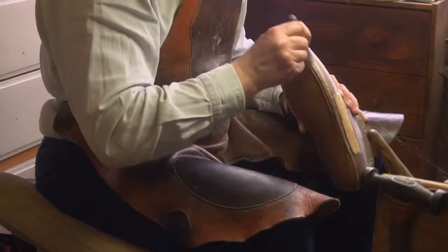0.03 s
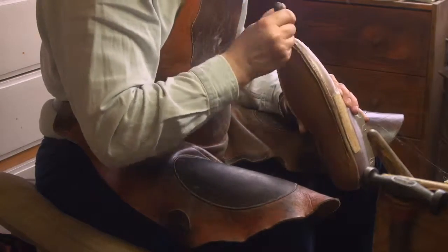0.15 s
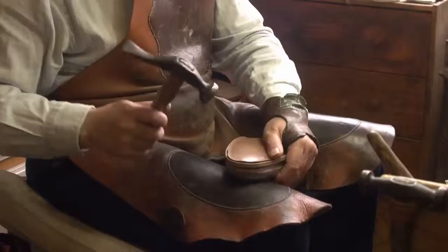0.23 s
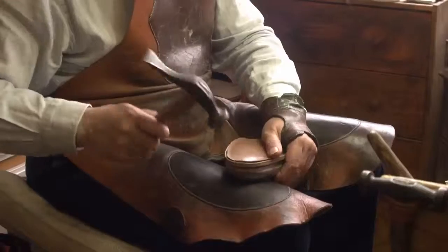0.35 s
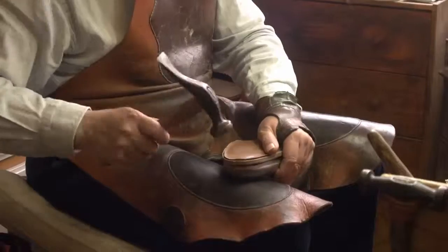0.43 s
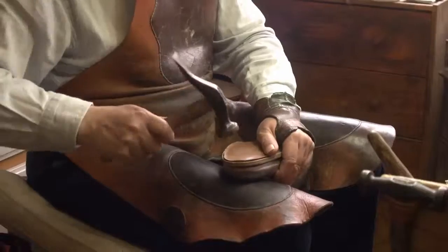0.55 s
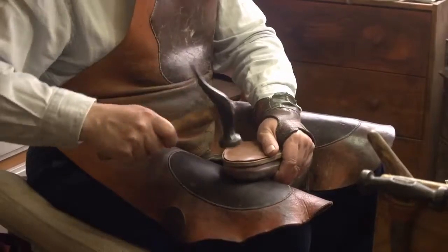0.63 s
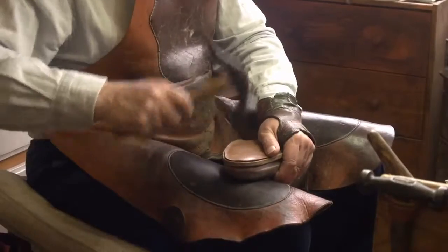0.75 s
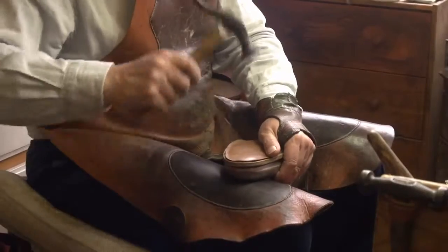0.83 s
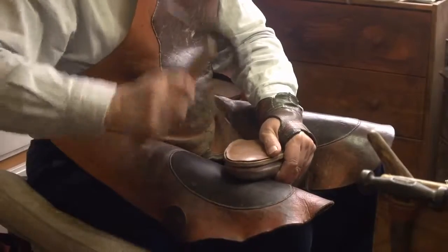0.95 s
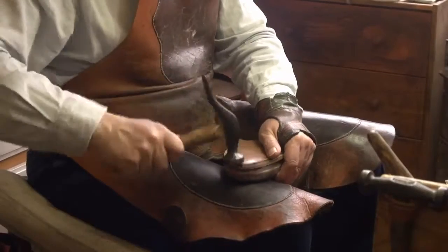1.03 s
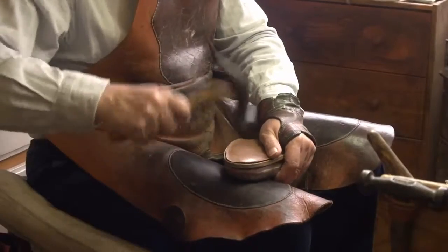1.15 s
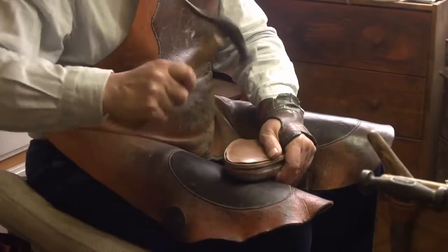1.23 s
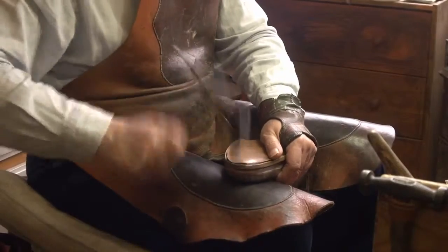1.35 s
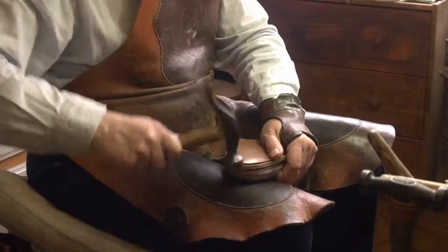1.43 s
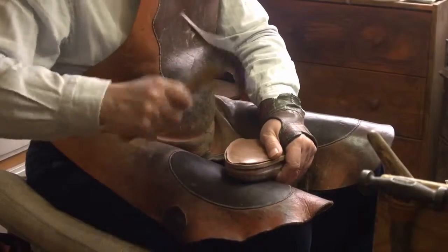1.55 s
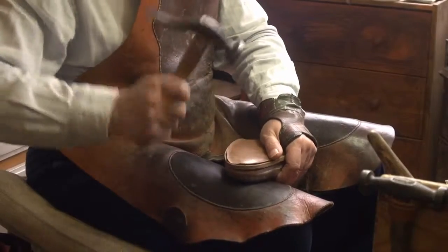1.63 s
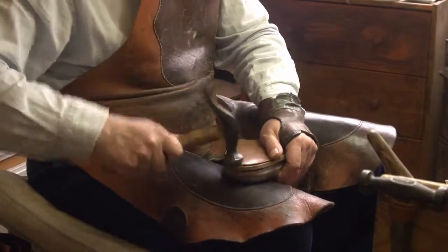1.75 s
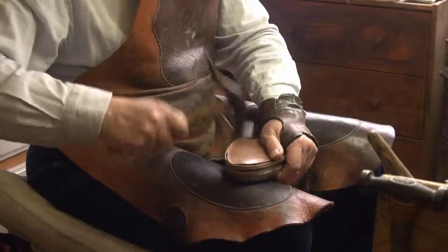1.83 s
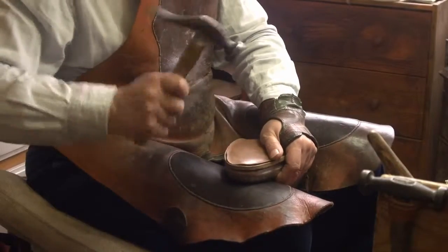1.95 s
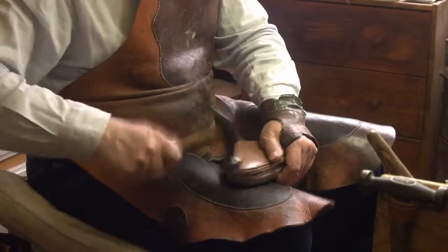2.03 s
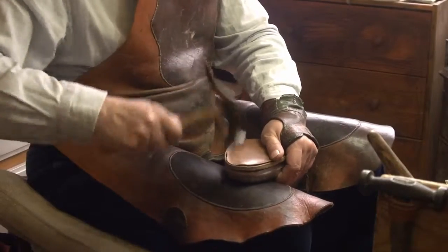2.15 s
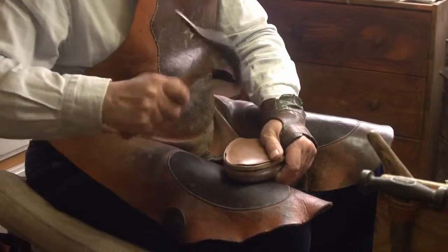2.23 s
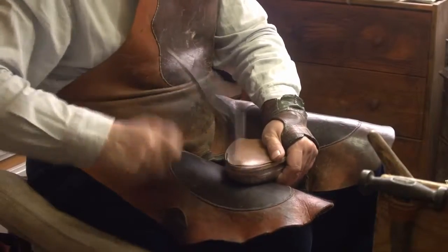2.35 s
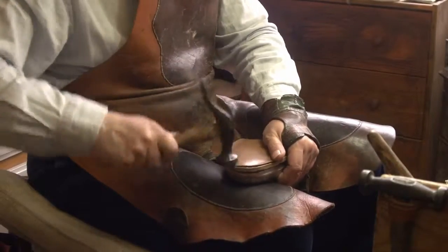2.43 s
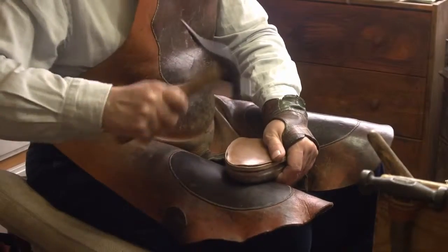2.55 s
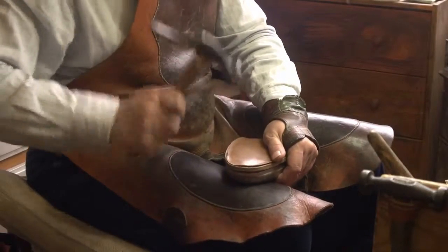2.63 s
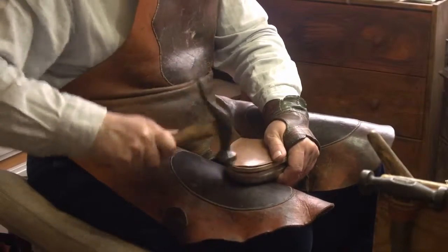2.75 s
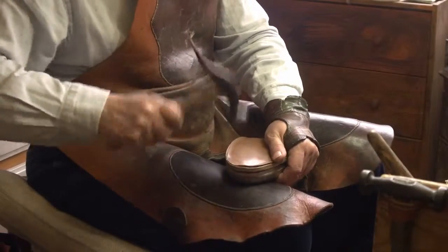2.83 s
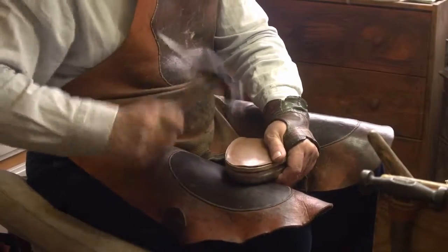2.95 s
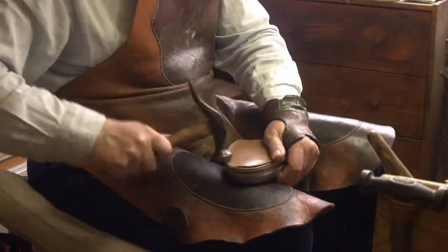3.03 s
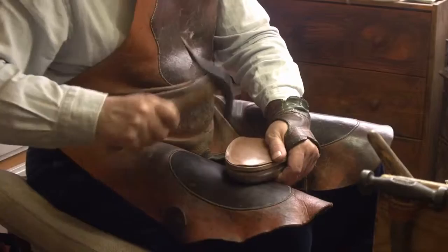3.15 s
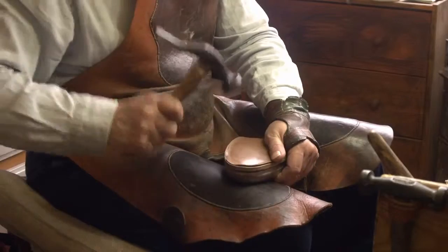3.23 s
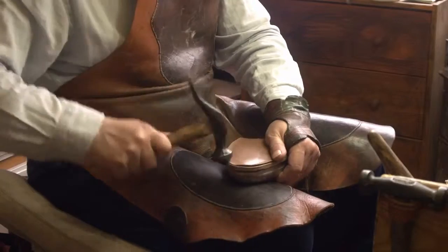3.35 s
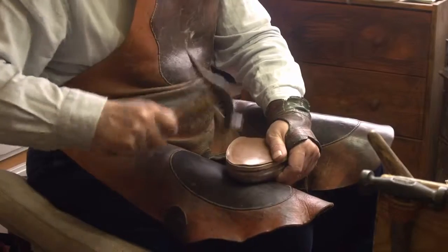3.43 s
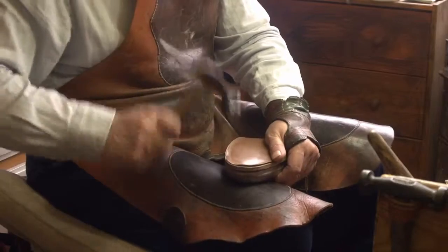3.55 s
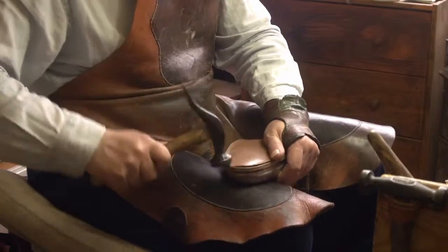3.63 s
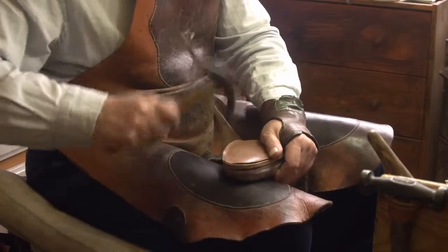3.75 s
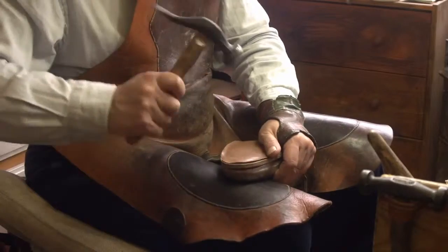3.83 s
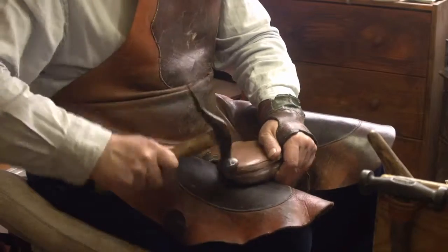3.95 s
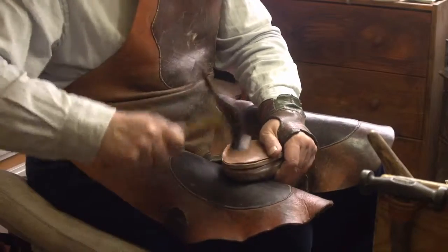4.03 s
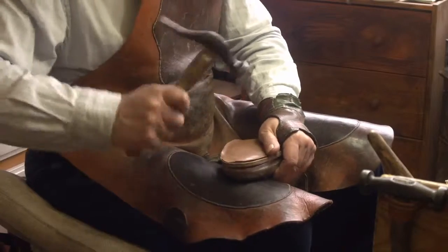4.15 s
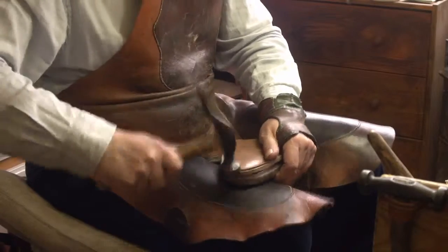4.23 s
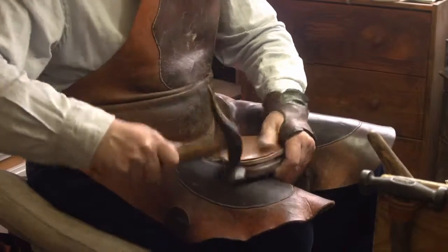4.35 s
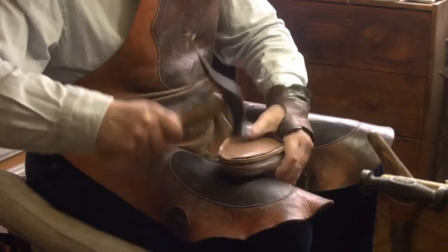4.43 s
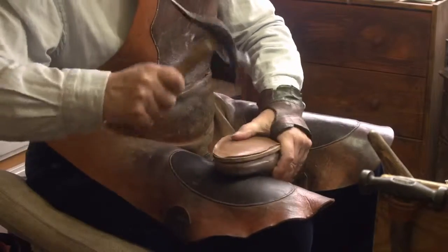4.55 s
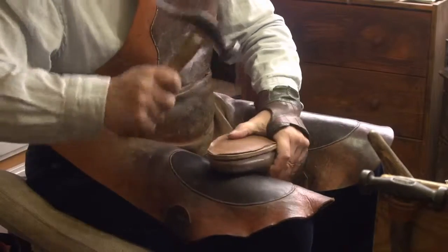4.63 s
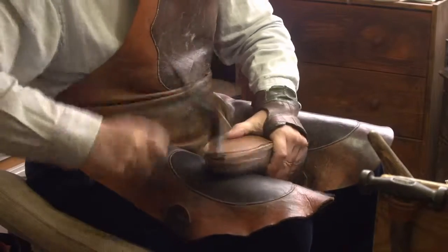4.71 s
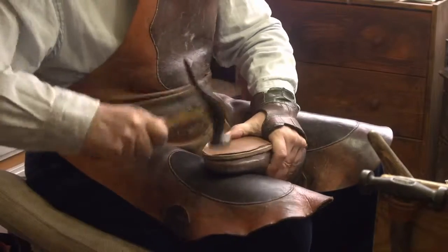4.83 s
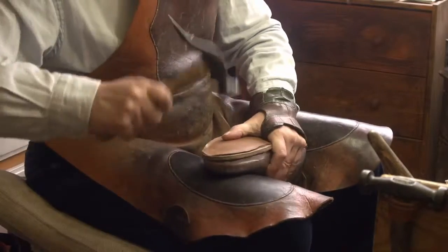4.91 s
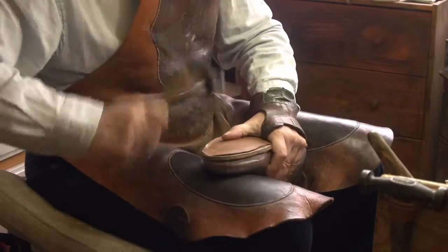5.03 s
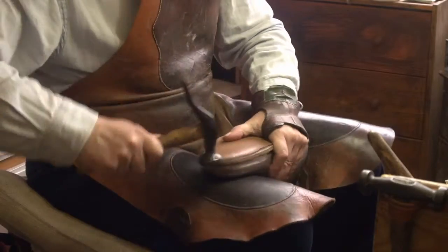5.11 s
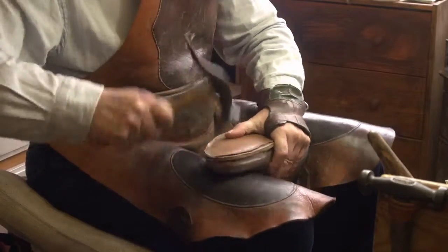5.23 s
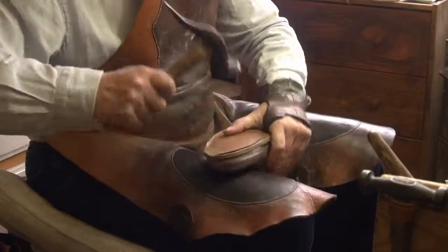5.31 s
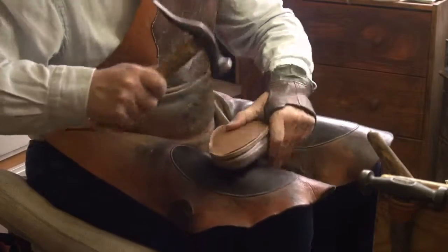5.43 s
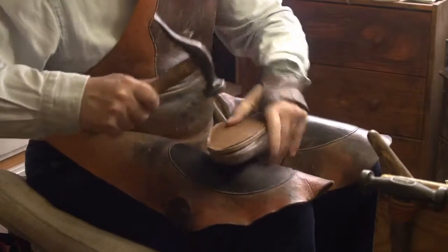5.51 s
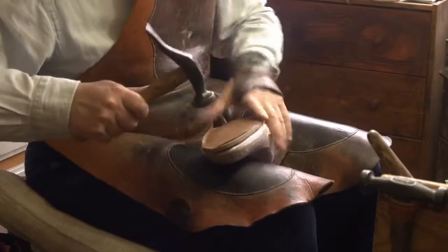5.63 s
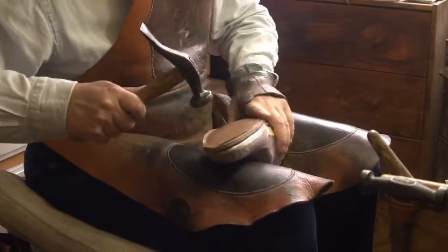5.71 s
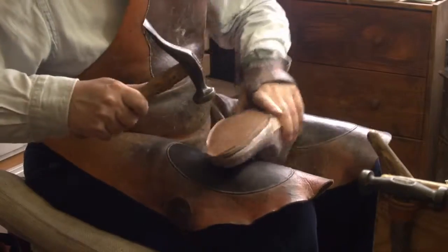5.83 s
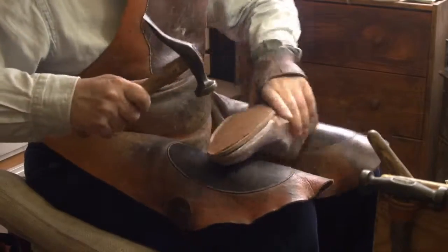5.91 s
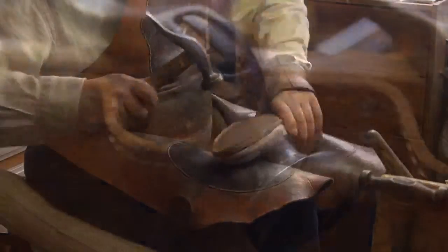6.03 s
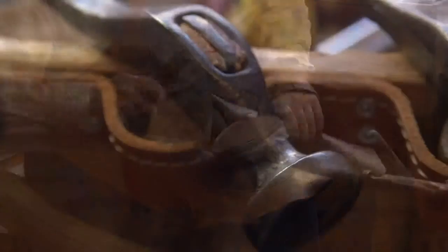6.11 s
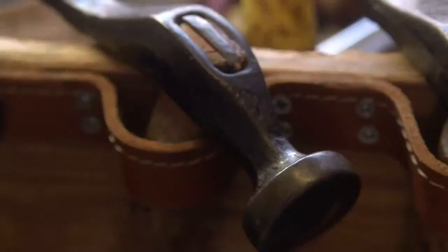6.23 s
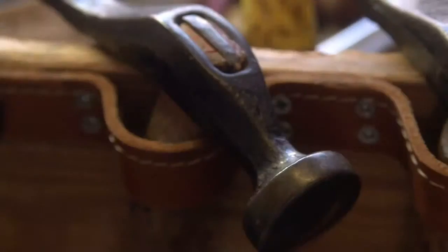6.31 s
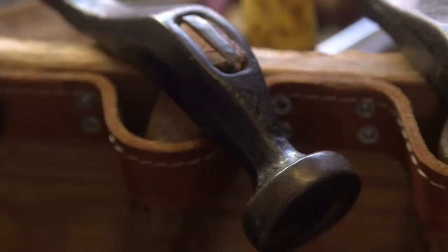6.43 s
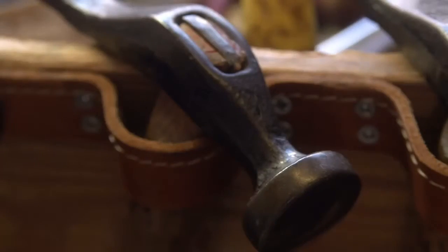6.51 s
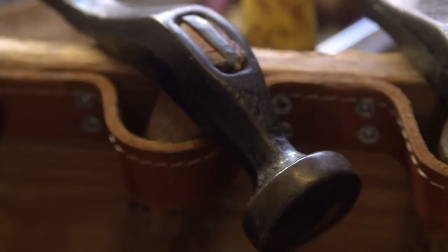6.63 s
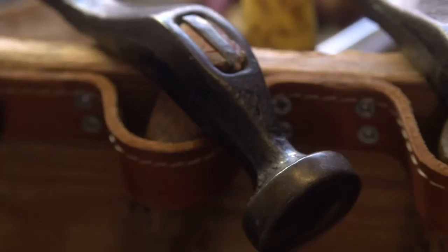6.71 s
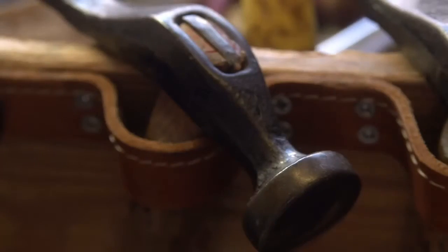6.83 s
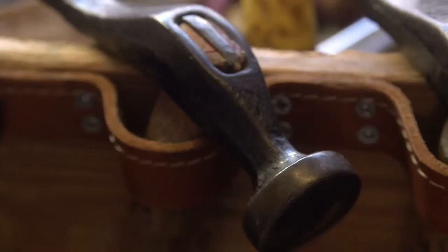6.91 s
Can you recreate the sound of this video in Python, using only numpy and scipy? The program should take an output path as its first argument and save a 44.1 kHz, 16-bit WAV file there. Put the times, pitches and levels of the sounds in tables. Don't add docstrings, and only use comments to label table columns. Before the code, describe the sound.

In a small workshop with low mains hum and room air, a shoe shifts softly on a leather apron. A steel hammer then beats its sole in quick, fairly even blows, each a blunt woody slap with short room ring and faint metallic singing. The shoe is turned with rubbing and creaks, then three duller blows follow. Close microphone, clipped, right channel only.

```python
import sys
import numpy as np
from scipy import signal
from scipy.fft import rfft, irfft, next_fast_len
from scipy.io import wavfile
from scipy.ndimage import uniform_filter1d, map_coordinates

SR = 44100
rng = np.random.default_rng(int(sys.argv[2]) if len(sys.argv) > 2 else 0)


def master(y):
    cut = np.clip(np.atleast_2d(y).T, -1, 1)
    pcm = np.round(cut * 32767)
    wavfile.write(sys.argv[1], SR, pcm.astype(np.int16))


def gain_from_db(level_db):
    decades = np.asarray(level_db, float) / 20
    return 10 ** decades


N = 307377
ONE_SIDE_DB = 6


def along(points, hz):
    f, v = np.transpose(points)
    return np.interp(np.log(hz + 1), np.log(f + 1), v)


def unit(x):
    return x / np.sqrt(np.mean(x ** 2) + 1e-20)


def wobble(rate):
    knots = rng.standard_normal(int(N * rate / SR) + 4)
    return map_coordinates(knots, [np.arange(N) * rate / SR])


def coloured(x, points):
    m = next_fast_len(len(x) + 8192)
    gain = gain_from_db(along(points, np.fft.rfftfreq(m, 1 / SR)))
    cepstrum = irfft(np.log(gain + 1e-6), m)
    cepstrum[1:m // 2] *= 2
    cepstrum[m // 2 + 1:] = 0
    return irfft(rfft(x, m) * np.exp(rfft(cepstrum)), m)[:len(x)]


def hiss(points):
    return unit(coloured(rng.standard_normal(N), points))


def ring(modes, t, scatter_db, turn=0):
    hz, db, t60 = np.transpose(modes)[..., None]
    db = db + scatter_db * rng.standard_normal(hz.shape)
    return np.sum(gain_from_db(db - 60 * t / t60) * np.sin(2 * np.pi * (hz * t + turn)), axis=0)


# frequency in Hz, level in dB per Hz.
AIR = [(20, -7), (54, -16), (125, -16.5), (250, -17), (430, -20.5), (1500, -31), (2500, -42), (5000, -47),
       (15500, -48.5), (16300, -54)]
# start in seconds, length in seconds, level in dB.
WHINES = [
    (0.208, .47, -69.5),
    (.87, .55, -66),
    (1.755, .5, -71),
    (5.62, .35, -68.5),
]


def background():
    now = np.arange(N) / SR
    hum_hz = 49.5 + 1.5 * wobble(6)
    hum = np.sin(2 * np.pi * np.cumsum(hum_hz) / SR) * gain_from_db(3 + 2 * wobble(8))
    hum = gain_from_db(-56 + 2 * wobble(0.84)) * hum
    swells = np.zeros(N)
    for start_s, length_s, db in WHINES:
        swells += gain_from_db(db) * np.sin(np.pi * np.clip((now - start_s) / length_s, 0, 1) ** 0.7)
    whine = swells * gain_from_db(1.5 * wobble(16)) * np.sin(2 * np.pi * 2300 * now)
    air = gain_from_db(-55 + 0.54 * wobble(3.9)) * hiss(AIR)
    return gain_from_db(ONE_SIDE_DB) * (hum + whine + air)


# start in seconds, peak in dB, pitch in Hz.
TICKS = [
    (.181, -74, 4500),
    (0.223, -59, 4500),
    (4.415, -35, 3000),
    (5.05, -69, 4000),
    (5.711, -39, 2900),
    (5.752, -41.5, 1790),
]


def ticks():
    out, t = np.zeros(N + SR), np.arange(SR // 2) / SR
    for s, db, hz in TICKS:
        burst = gain_from_db(-60 * t / 0.056) * rng.standard_normal(len(t))
        puff = coloured(burst, [(1000, 5.5), (10000, -11)])
        out[round(s * SR):][:len(t)] += gain_from_db(db + 2) * (puff + ring([(hz, -3, 0.02)], t, 1))
    return out[:N]


# start in seconds, level in dB, pitch in Hz, 60 dB decay in seconds.
CREAKS = [(.81, -62, 6560, .05), (5.33, -42, 875, .36), (5.325, -44, 2400, .1), (5.34, -43, 2620, .14),
          (5.35, -45, 1710, .17), (5.34, -43, 460, .15), (5.38, -44, 1495, .22), (5.44, -43, 820, .12),
          (5.45, -46, 2900, .2), (5.52, -45, 1150, .09), (5.6, -42, 822, .11), (5.709, -46, 1100, .07),
          (5.92, -45, 820, .23)]
CLUSTER = (.975, 1, 1.03)


def creaks():
    out, t = np.zeros(N + SR), np.arange(SR // 2) / SR
    for s, db, hz, t60 in CREAKS:
        partials = [(hz * ratio, db, t60) for ratio in CLUSTER]
        creak = ring(partials, t, 1.3, rng.random((3, 1)))
        out[round(s * SR):][:len(t)] += (1 - np.exp(-t / 0.002)) * creak
    return out[:N]


# start in seconds, level in dB, pitch in Hz.
BUMPS = [
    (.04, -39, 214),
    (.09, -43, 437),
    (0.131, -29.5, 99),
    (.17, -43, 246),
    (5.58, -37, 159),
    (6.02, -31, 71),
]


def bumps():
    out, t = np.zeros(N + SR), np.arange(SR // 2) / SR
    for s, db, hz in BUMPS:
        out[round(s * SR):][:len(t)] += (1 - np.exp(-t / 0.015)) * ring([(hz, db, 0.2)], t, 0)
    return out[:N]


# frequency in Hz, level in dB per Hz.
RUB = [(700, -34), (1200, -7.5), (2300, -7.5), (3000, -6), (5000, -11.5), (8000, -21), (10000, -32.5)]
# frequency in Hz, level in dB per Hz.
SHEEN = [(6000, -31), (9000, 2.5), (15600, -1.5), (16200, -29)]
# frequency in Hz, level in dB per Hz.
HOLLOW = [(100, -20), (200, -3.5), (330, -9), (480, -5.5), (700, -2.5), (840, -0.5), (980, -4.5),
          (1150, -5), (1300, -22), (1520, -2), (1800, -11.5), (2700, -12.5), (3300, -24.5)]
# fastest moment in seconds, rise in seconds, fall in seconds, rub level in dB,
# cavity over rub in dB.
STROKES = [
    (.245, 0.041, 0.1, -68, 9),
    (.45, 0.23, 0.69, -77.5, 2.5),
    (4.41, 0.063, 0.11, -56.5, 7),
    (4.63, 0.24, 0.22, -57, 0),
    (5.331, 0.088, 0.14, -56, 4),
    (5.52, 0.18, 0.21, -44, -2.5),
    (5.72, 0.057, 0.18, -61, 0),
    (5.97, 0.14, 0.22, -47, -4),
]


def sliding():
    now = np.arange(N) / SR
    top_s, rise_s, fall_s, rub_db, body_db = np.transpose(STROKES)[..., None]
    away = abs(now - top_s) / np.where(now < top_s, rise_s, fall_s)
    speed = gain_from_db(rub_db - 23 * away ** 1.86)
    grit = rng.standard_normal(N) * gain_from_db(1.1 * wobble(440))
    hz, s, z = signal.stft(grit, SR, nperseg=512)
    patches = uniform_filter1d(rng.standard_normal(z.shape), size=5, axis=0)
    patches = unit(uniform_filter1d(patches, size=9, axis=1))
    grit = signal.istft(z * gain_from_db(1.2 * patches), SR, nperseg=512)[1][:N]
    rub = unit(coloured(grit, RUB))
    shine = gain_from_db(-9 + 2 * wobble(25)) * unit(coloured(grit, SHEEN))
    body = gain_from_db(1.7 * wobble(22)) * hiss(HOLLOW) * np.sum(speed * gain_from_db(body_db), axis=0)
    friction = speed.sum(axis=0) * gain_from_db(1.8 * wobble(85)) * (rub + shine)
    return gain_from_db(ONE_SIDE_DB) * (friction + body)


# frequency in Hz, level in dB per Hz.
DIFFUSE = [(24, -18), (40, -29.5), (87, -14.5), (234, -15), (342, -8), (418, -2.5), (626, -5.5),
           (1340, -10.5), (5770, -22), (9100, -20), (14700, -21.5), (16700, -77.5)]
# frequency in Hz, 60 dB decay in seconds.
DYING = [(40, 0.17), (110, 0.47), (280, 0.23), (740, 0.33), (1940, 0.34), (5120, 0.33), (13500, 0.21)]


def tail(t):
    hz, s, z = signal.stft(rng.standard_normal(len(t)), SR, nperseg=256)
    t60 = along(DYING, hz)[:, None]
    beyond = gain_from_db(-31.5 - 30 * s / t60)
    x = signal.istft(z * (gain_from_db(-60 * s / t60) + beyond), SR, nperseg=256)[1][:len(t)]
    x = coloured(x, DIFFUSE)
    return x / np.sqrt(np.mean(x[:SR // 20] ** 2))


# frequency in Hz, level in dB, 60 dB decay in seconds.
ROOM_MODES = [(37.3, -20.5, 0.9), (58.7, -16, 0.14), (96.5, -11.5, 0.29), (151.2, -15.5, 0.54),
              (181, -20, 0.28), (242.2, -11, 0.28), (310.6, -3, 0.19), (390, -0.5, 0.24),
              (428.5, 2.5, 0.25), (448, -14.5, 0.088), (489.7, -4, 0.25), (526, -8.5, 0.48),
              (601.4, -2, .29), (649.7, -12, 0.16), (647.5, -6.5, 0.39), (803.6, 1.5, 0.25),
              (910, -14, .25), (1015, -13, 0.24), (1060, -10, 0.11), (1296, -26, 0.26), (1369, -1, 0.089),
              (1565, -8.5, 0.38), (1610, -12, 0.37), (1740, -22.5, .31), (1863, -1.5, 0.18),
              (2070, -5.5, 0.1), (2385, -15, 0.097), (2710, -3, 0.15)]


def room_answer(t, same, turns):
    diffuse = 0.91 * same + 0.43 * tail(t)
    room = gain_from_db(-0.5) * diffuse + gain_from_db(-6.5) * ring(ROOM_MODES, t, 1.0, turns)
    return (1 - np.exp(-t / 0.0024)) * room


# frequency in Hz, level in dB, 60 dB decay in seconds.
SOLE = [(88, -10.5, 0.041), (206.7, -4.5, 0.028), (387.4, -3.5, 0.078), (573.3, -3, 0.073),
        (666.2, -5, 0.089), (767.5, 3.5, 0.047), (1125, -5.5, 0.03), (1842, 5, 0.012)]


def struck_sole(t):
    rise = 1 - np.exp(-(t / 0.0004) ** 2)
    spot = 1 + 0.03 * rng.standard_normal()
    shoe = -gain_from_db(9.0) * ring(SOLE, t * spot, 3.72)
    slap = gain_from_db(22.5 - 60 * t / 0.027) * rng.standard_normal(len(t))
    return rise * (shoe + slap)


# frequency in Hz, level in dB, 60 dB decay in seconds.
STEEL = [(6400, -46, 0.88)]
# start in seconds, force in dB, edge in dB, crack in dB, thump in dB
BLOWS = [(1.058, -17.5, -8, -32, -4.5), (1.4147, -16.5, -7, -31.5, -5.5),
         (1.7536, -14.5, -7.5, -25.5, -7.5), (2.0796, -14.5, -7, -29.5, -5),
         (2.4123, -15.5, -7, -30.5, -4.5), (2.7329, -16.5, -9, -36, -2), (3.0329, -18, -10.5, -36.5, -.5),
         (3.3373, -19, -11.5, -31.5, -1), (3.6356, -21, -10, -31.5, 1), (3.971, -15.5, -6.5, -26.5, -4.5),
         (4.2733, -16.5, -7, -32.5, -4), (4.769, -19.5, -6.5, -32, -5.5), (5.111, -13.5, -6.5, -27.5, -9),
         (6.2967, -16, -10.5, -32.5, -7), (6.6364, -14.5, -11, -36.5, -4.5), (6.9485, -15.5, -11, -38, .5)]


def hammer():
    out, t = np.zeros(N + 2 * SR), np.arange(30000) / SR
    same, turns = tail(t), rng.random((len(ROOM_MODES), 1))
    for s, force_db, edge_db, crack_db, thump_db in BLOWS:
        deep_db = -2 - 0.6 * thump_db
        hardness = [(90, deep_db), (190, thump_db + 9), (420, 0.5 * thump_db + 3), (750, 0),
                    (1500, edge_db + 7.5), (2500, edge_db + 6), (7000, crack_db + 14)]
        blow = coloured(room_answer(t, same, turns) + struck_sole(t), hardness)
        singing_db = -15.5 - force_db
        if s > 6.0:
            singing_db -= 12
        blow += gain_from_db(singing_db) * ring(STEEL, t, 1)
        at = round(s * SR) - 12
        out[at:at + len(t)] += gain_from_db(force_db + 9) * blow
        lead = np.linspace(0, 1, 44) ** 2 * np.diff(rng.standard_normal(45))
        out[at - 44:at] += gain_from_db(force_db + crack_db + 24) * lead
    return out[:N]


def scene():
    right = background() + ticks() + creaks() + bumps() + sliding() + hammer()
    return np.array([gain_from_db(-93) * rng.standard_normal(N), right])


# frequency in Hz, gain in dB.
MIC = [(20, 0.5), (8000, -0.5), (12000, -6), (15800, -11), (16800, -27)]


def overloaded_input(x):
    top, hard = 0.6, 12
    x = x / (1 + np.abs(x / top) ** hard) ** (1 / hard)
    x = signal.lfilter([1, -1], [1, -np.exp(-2 * np.pi * 6 / SR)], x)
    return coloured(x, MIC)


def low_pass(x):
    return signal.sosfilt(signal.butter(12, 16820, fs=SR, output="sos"), x)


def record(dry):
    mix = np.array([dry[0], overloaded_input(dry[1])])
    return low_pass(mix)


dry = scene()
out = record(dry)
master(out)
```